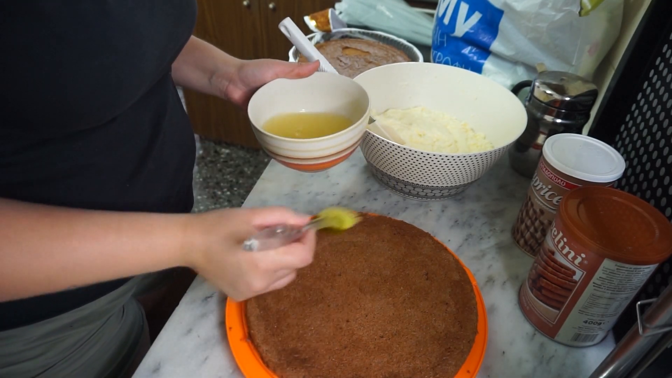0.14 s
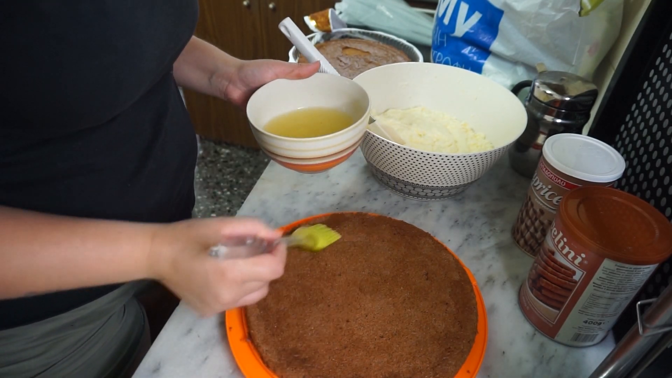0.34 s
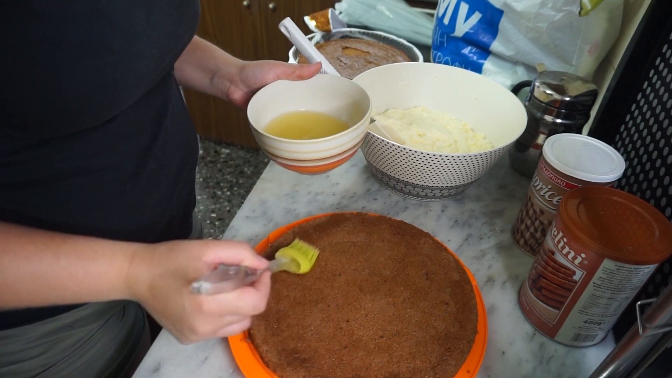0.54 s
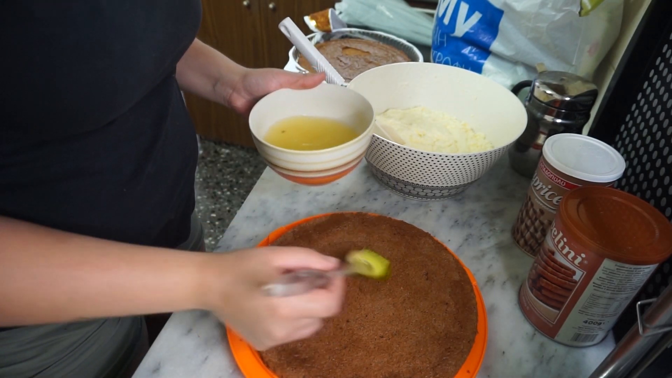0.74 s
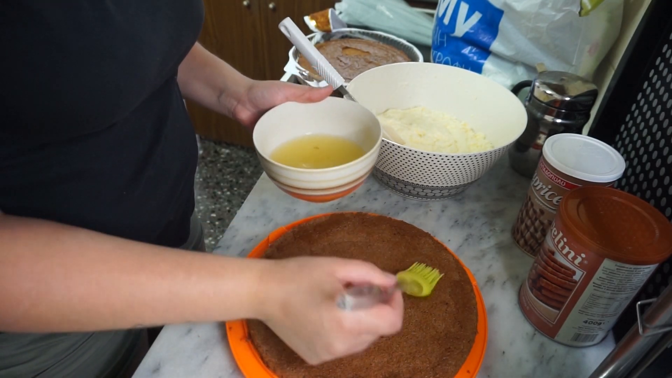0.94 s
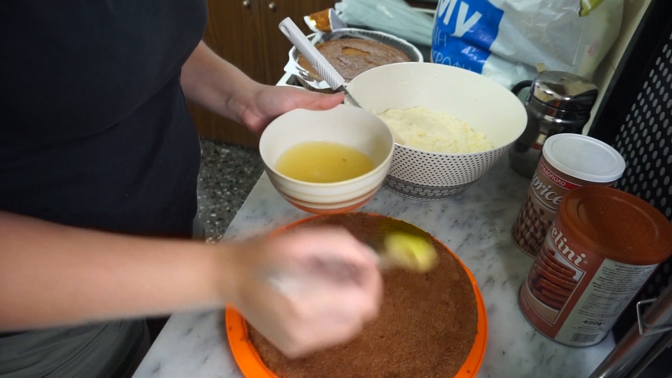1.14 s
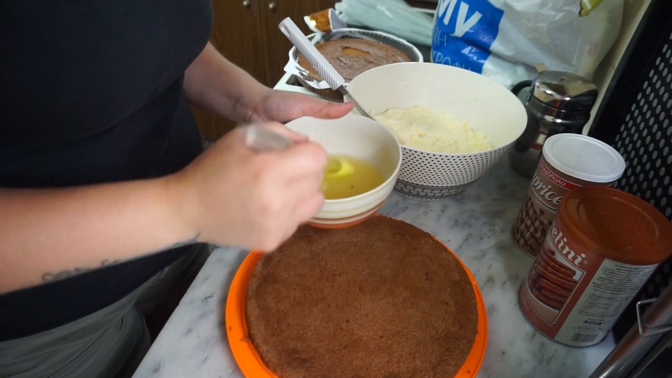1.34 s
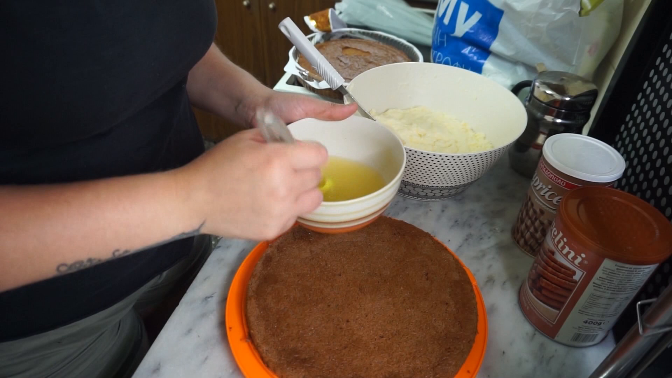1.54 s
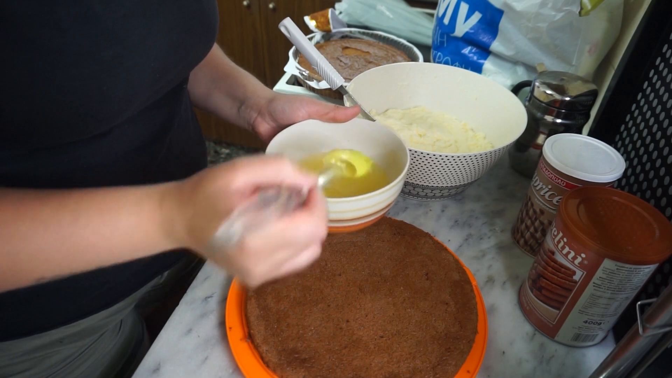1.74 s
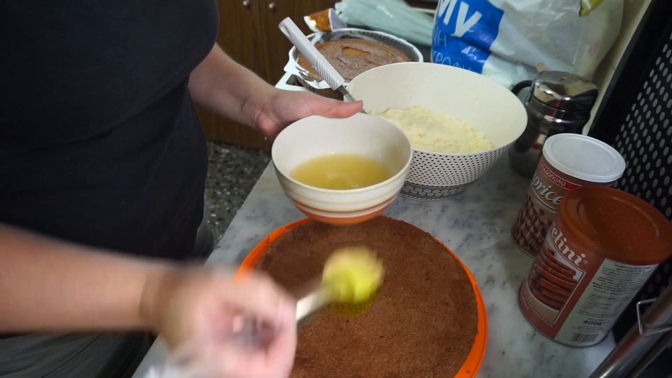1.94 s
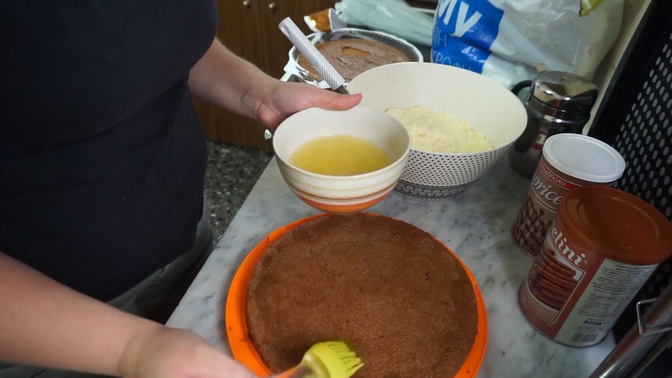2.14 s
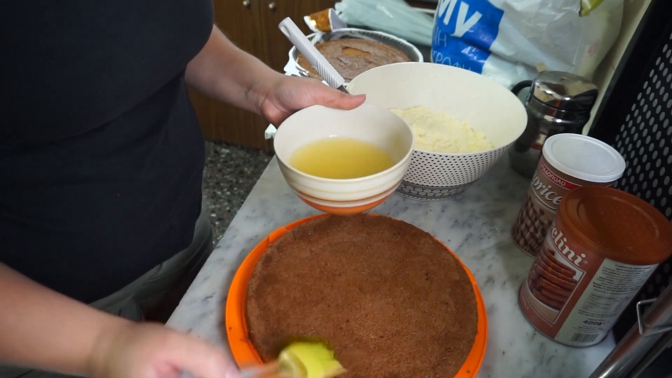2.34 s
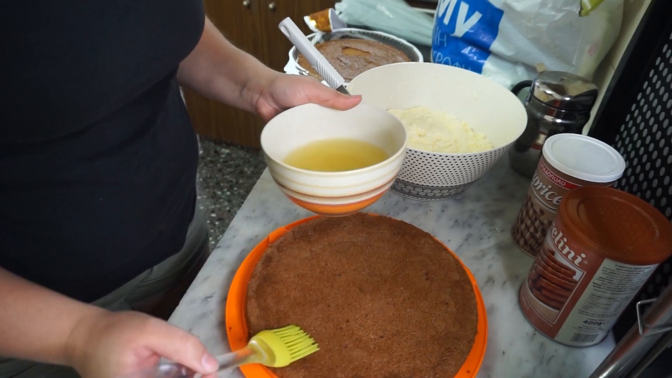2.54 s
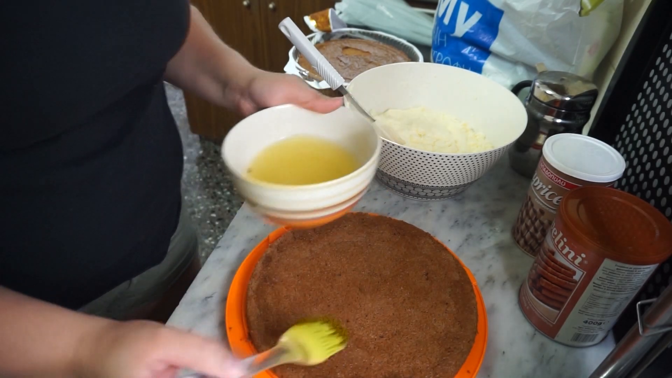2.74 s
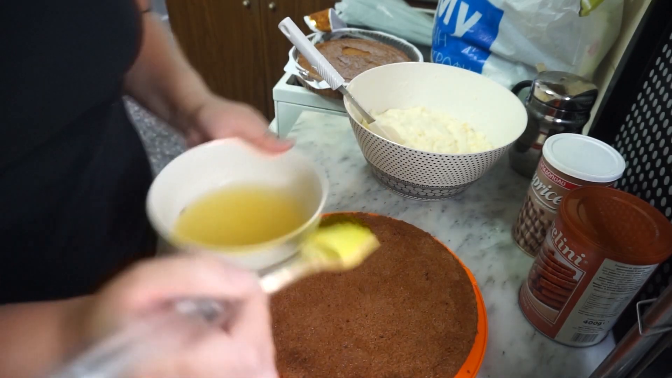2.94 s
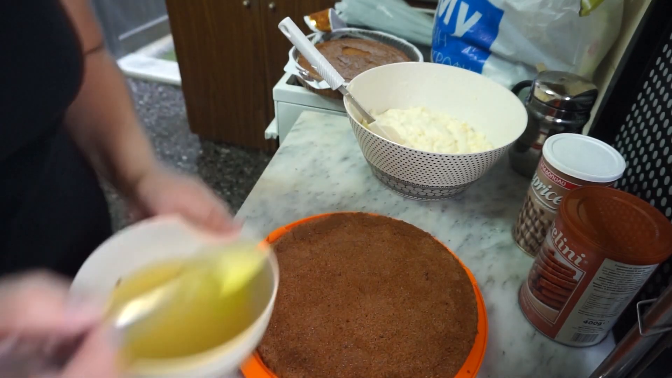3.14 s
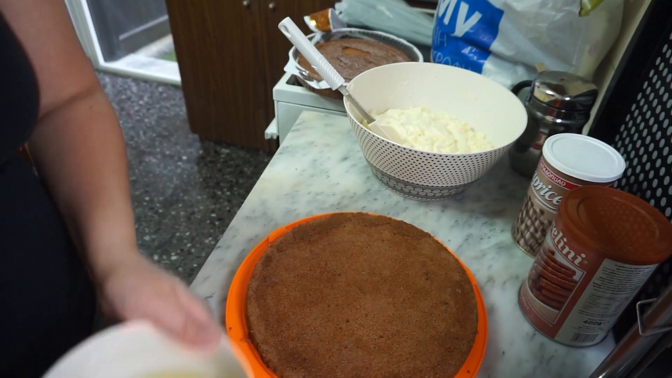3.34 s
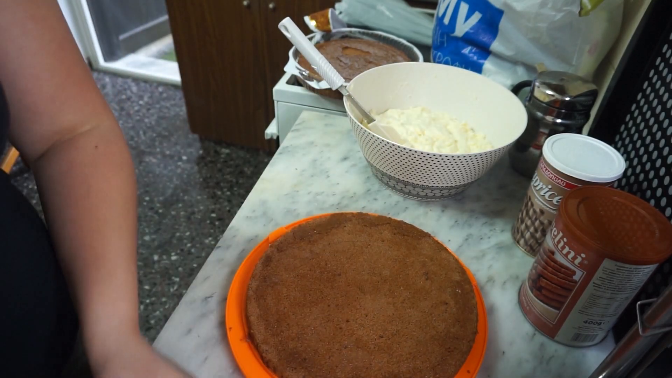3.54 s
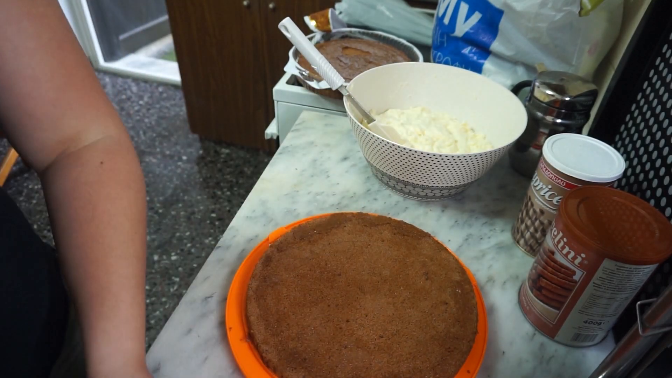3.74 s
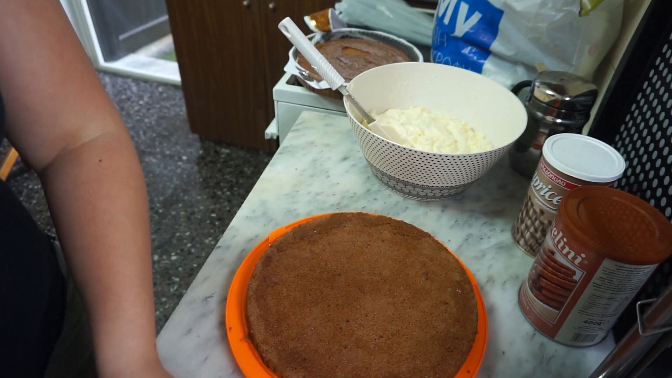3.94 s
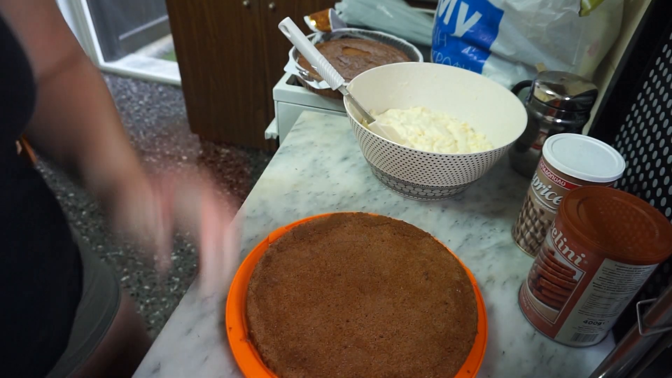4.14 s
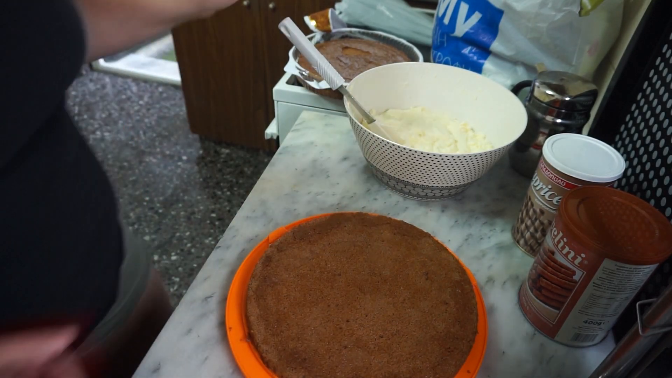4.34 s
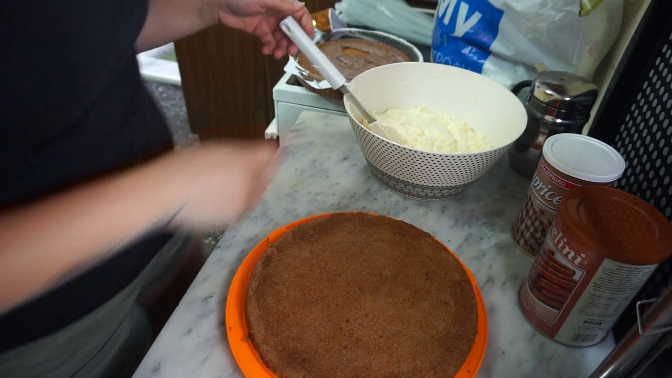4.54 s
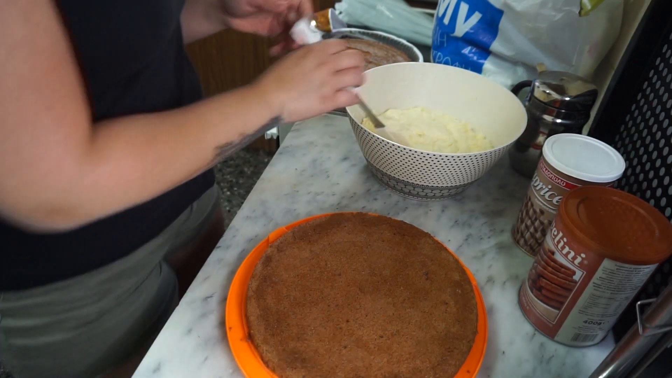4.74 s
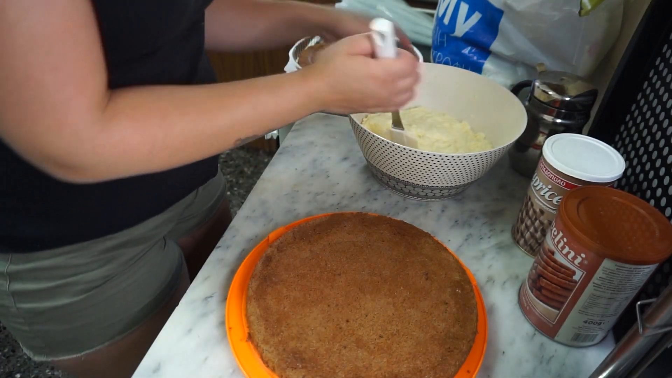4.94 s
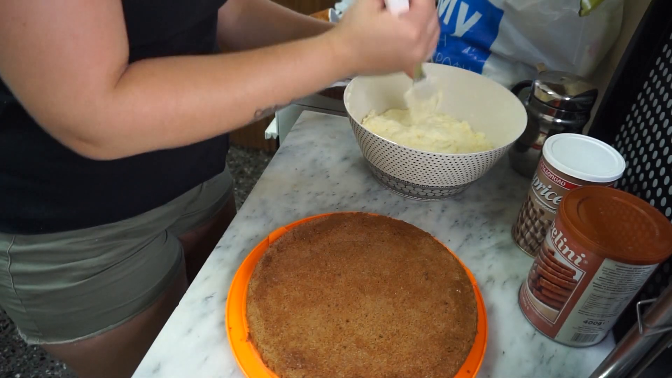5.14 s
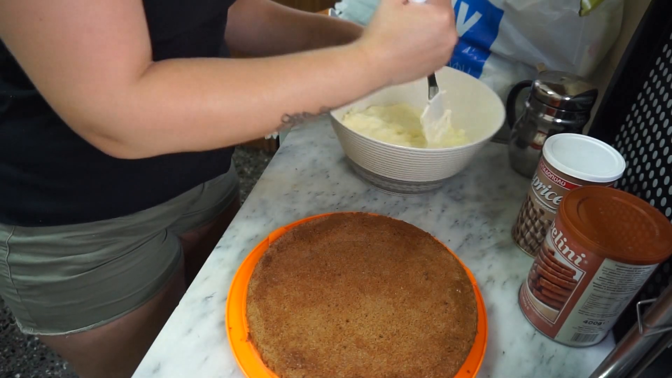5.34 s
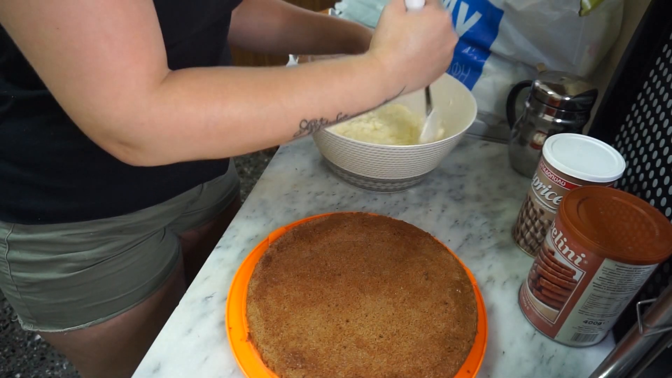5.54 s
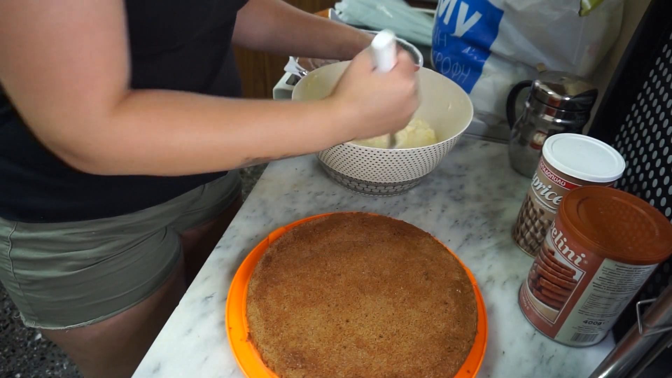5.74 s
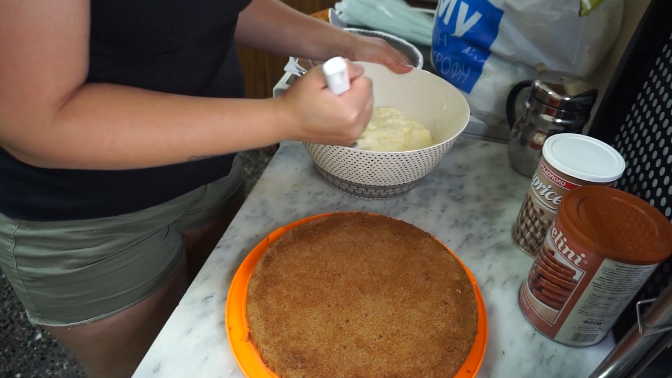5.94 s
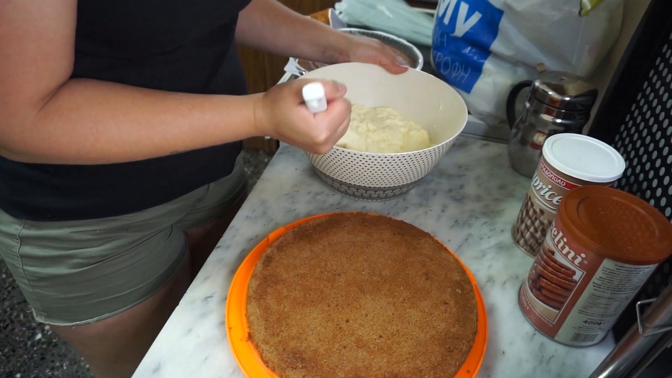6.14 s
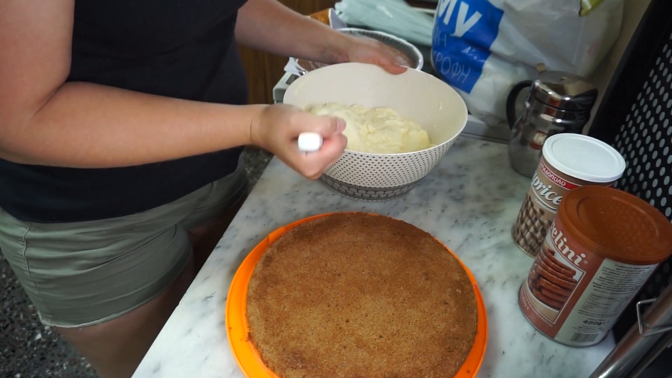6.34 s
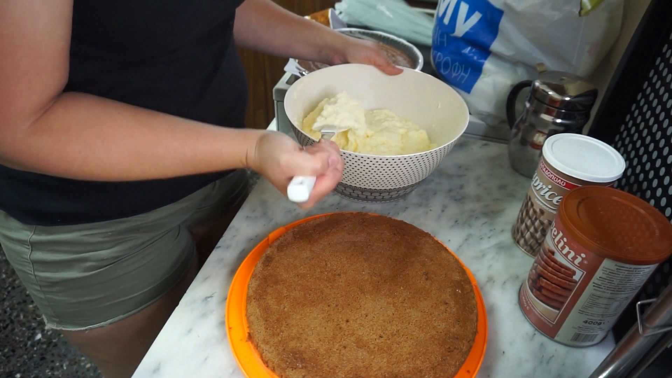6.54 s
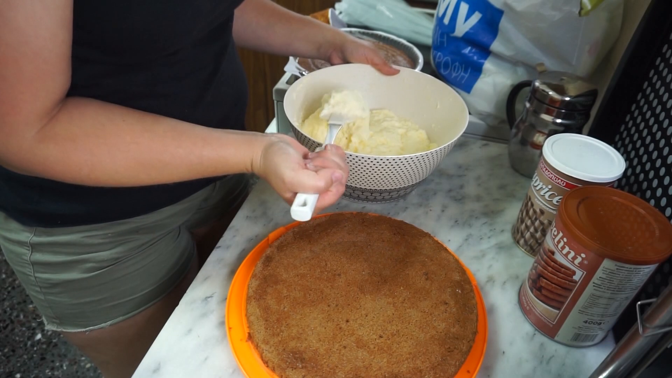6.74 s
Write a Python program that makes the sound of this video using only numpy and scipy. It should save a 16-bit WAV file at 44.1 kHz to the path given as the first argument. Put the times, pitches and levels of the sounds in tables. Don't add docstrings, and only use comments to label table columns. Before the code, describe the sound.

A wet pastry brush fizzes and taps, drops into a ceramic bowl that rocks loudly on stone, then a spatula scrapes and knocks a larger bowl.

```python
import sys
import numpy as np
from scipy import signal
from scipy.fft import rfft, irfft, next_fast_len
from scipy.io import wavfile

SR = 44100
rng = np.random.default_rng(int(sys.argv[2]) if len(sys.argv) > 2 else 0)


def invert_db(x):
    u = np.asarray(x, float) / 20
    return 10 ** u


def inscribe(sig):
    pcm = np.round(np.clip(np.atleast_2d(sig).T, -1, 1) * 32767)
    wavfile.write(sys.argv[1], SR, pcm.astype(np.int16))


N = 299439

# [f/Hz, density/dB per Hz]
AIR_COLOUR = [(35, -76), (60, -51), (91, -5), (219, -55.5), (278, -18), (353, -20), (617, -7.5), (695, -6),
              (1340, -1.5), (1480, -6.5), (2540, -8.5), (7000, -18), (9100, -35.5), (15400, -120)]
CLOTH_COLOUR = [(120, -67), (200, -37), (275, -23), (504, -17.5), (563, -47), (693, -9), (1030, -1),
                (2810, 0), (9000, -20), (11700, -61), (19800, -120)]
CREAM_COLOUR = [(240, -72), (400, -66), (580, 0.5), (719, -23), (1220, -21), (1290, -3.5), (1940, 3),
                (7000, -20.5), (9100, -49), (15400, -120)]
FIZZ_COLOUR = [(4000, -6), (6500, -4.5), (10000, -0.5), (14000, 0), (15800, -3.5), (16100, -35.5)]
# [f/Hz, width/Hz, level/dB]
FOOT_BODY = [(206, 50, -17), (343, 270, -9), (606, 159, 3.5), (910, 440, -1.5)]
RIM_BODY = [(1510, 1550, -7.5), (1860, 560, 3), (2390, 390, 3), (3270, 400, 4), (3950, 490, 1),
            (5440, 560, -12)]
EDGE_BODY = [(2500, 230, 0), (3270, 280, 1)]
# [f/Hz, t60/s]
WALL_DECAY = [(150, 0.64), (1000, 0.71), (3000, 0.74), (8000, 0.46), (15000, 0.4)]
# [f/Hz, likeness/0-1]
PORT_LIKENESS = [(60, .85), (130, .98), (260, .93), (520, .88), (1000, .7), (2400, .55), (6000, .4),
                 (9000, .35), (15000, .3)]
# [f/Hz, left lead/radians]
PORT_LEAD = [(0, -1), (2580, 0.9842), (3190, 0.87), (4740, 4.5), (5860, 4), (9130, 0.6), (16500, 1.5)]
# [f/Hz, left-right level/dB]
PORT_TILT = [(60, 0), (500, -.6), (1000, -1), (2000, -2.5), (4500, -1.5), (9000, -1), (15000, -.7)]

# [t/s, hold/s, level/dB]
DRONE_SWELLS = [(0, .1, -61), (1.1, 0.31, -53), (2.0, 1, -60), (5.8, 0.99, -65)]
# [t/s, hold/s, level/dB]
WEIGHT_SHIFTS = [(0, 0.33, -64.5), (.98, .01, -67), (2.04, .01, -66), (2.38, 0.025, -60), (2.7, 0.56, -74),
                 (3.95, 0.019, -53.5), (4.2, 0.69, -67), (5.46, 0.033, -47.5), (5.84, .02, -65)]
# [t/s, depth/dB]
GAIN_DUCKS = [
    (0, 11),
    (1.47, 1),
    (3.392, 12),
    (3.775, 15.5),
    (3.958, -4),
    (6.351, 1),
]
# [t/s, length/s, first top f/Hz, last top f/Hz, level/dB, share of the fall/0-1]
TRILLS = [(0.444, 0.096, 4350, 4190, -43, .5), (0.475, .06, 3900, 3600, -44, .6),
          (0.535, .045, 3560, 3500, -40, .25), (.6, .06, 3500, 3650, -52, .25),
          (0.6, 0.066, 4200, 4680, -44, .1), (0.662, .24, 4880, 4850, -32, .95),
          (.72, .15, 4100, 3800, -38, .5), (.93, .05, 2700, 2500, -47, .4),
          (0.977, 0.097, 4750, 4560, -50, .15)]

# [t/s, hold/s, level/dB]
SLEEVE_STROKES = [(.07, 0.02, -49), (.242, 0.0091, -48.5), (1.49, .004, -48), (2.1, 0.082, -50.5),
                  (2.296, .004, -43.5), (2.732, 0.047, -31.5), (2.85, 0.11, -34), (3.29, 0.1, -43.5),
                  (3.48, 0.048, -36.5), (3.6, 0.12, -45.5)]
# [t/s, hold/s, level/dB]
CREAM_PULL = [
    (4.8, 0.23, -40.5),
]
# [t/s, hold/s, foot level/dB, rim level/dB]
BOWL_SLIDES = [(.045, 0.0051, -34.5, -45), (5.15, 0.0039, -49, -41.5), (5.24, 0.035, -50.5, -46),
               (5.33, 0.033, -40, -37.5), (5.39, 0.015, -35.5, -38), (5.435, 0.015, -33, -37),
               (5.49, 0.013, -31.5, -35.5), (5.54, 0.024, -41, -37.5), (5.59, 0.033, -35, -33),
               (5.68, 0.0068, -38.5, -41.5), (5.786, 0.0062, -56, -53), (5.85, 0.12, -45.5, -41),
               (6.02, 0.19, -49.5, -49.5), (6.37, 0.06, -43, -43), (6.52, 0.04, -43, -40),
               (6.65, 0.02, -49, -52)]
# [t/s, hold/s, level/dB]
BLADE_SCRAPES = [
    (5.1, .03, -48),
    (5.29, .38, -40),
    (6.39, 0.044, -41.5),
    (6.505, 0.072, -41.5),
    (6.64, 0.029, -45.5),
]
# [t/s, hold/s, level/dB]
CRUST_FIZZ = [
    (0, 0.75, -47.5),
    (2.2, 0.96, -57),
]
# [t/s, hold/s, rate/dB over one a second]
BUBBLE_BURSTS = [
    (0, 0.32, 44),
    (2.05, .55, 31),
]
# [t/s, peak level/dB, left-right/dB, length/s, low end/dB]
BRISTLE_SMACKS = [(1.45, -46, 0, 0.022, -18), (1.4691, -22, -5, 0.018, -6), (1.4743, -31, -11, 0.03, -1),
                  (1.4834, -29.5, -5, 0.025, -3), (1.487, -41, -1, 0.02, -2), (1.503, -45, -3, 0.013, -15),
                  (1.548, -40.5, 3, 0.0094, -8), (1.849, -30.5, -3, 0.0059, -32),
                  (1.891, -40, -1.5, 0.011, -21), (3.382, -42.5, -3, .03, -20),
                  (3.394, -28.5, -4, 0.022, -13), (4.775, -47, -1, 0.031, -3), (5.1, -46, -6, .03, -15),
                  (5.14, -38.5, -5.5, 0.034, -16), (5.199, -46, -3, 0.054, -20),
                  (6.222, -26, -7, 0.014, 25), (6.351, -31, -9, 0.014, -9), (6.643, -37.5, -5, 0.024, -29),
                  (6.678, -46, -4, .025, -4)]
# [t/s, peak level/dB, left-right/dB, room/dB, f/Hz]
SOFT_THUDS = [(0.014, -31, -1.5, 4.5, 580), (0.027, -31, -4, -8, 925), (0.044, -27.5, -2, -19, 597),
              (0.036, -35, 0, -6, 420), (0.058, -35, 0, -4, 500), (0.26, -36, 0, -4, 546),
              (.655, -45, -2, 2, 490), (2.319, -20, -1, -6.5, 1033), (2.514, -27, -3.5, -2.5, 1028),
              (2.53, -35, -2.0, -16, 1230)]
LIGHT_TICKS = [(0.0144, -23, -6, -21, 2650), (0.0283, -21.5, -11, -11, 1740), (0.1077, -34, -6, -16, 3200),
               (1.4894, -28, -12, -12, 3270), (1.8487, -37, 1, -2, 2410), (2.228, -31.5, -5, -3, 3600),
               (2.1494, -35, -2, -11, 2800), (2.3201, -27.5, -7, -18, 2120), (3.755, -34, 3, -14, 4360),
               (5.0894, -34.5, -6, 7, 3320), (5.1472, -31, -9, -19, 2170), (5.2345, -25, -6, -3, 3830),
               (5.8394, -37, -8, 7, 1910), (6.4394, -29, -10, -7, 3150), (6.6428, -27, -7, -13, 3700),
               (6.661, -31, -5, -10, 3350)]

# [length/s, level/dB, left-right/dB, room/dB]
RIM_SONG = (.036, -15, 1.0, -12)
# [f/Hz, level/dB, t60/s]
HANDLE_MODES = [(962, -6.5, 0.043), (2020, 5, 0.021), (2320, -7, 0.036), (2500, -3, 0.027),
                (2617, 7.5, 0.02), (2850, 0.5, 0.035), (4200, -7, 0.037), (4460, -4, 0.043),
                (4654, -3.5, 0.04), (5910, -5.5, 0.038), (6322, -2, 0.11), (8950, -22, 0.06),
                (10480, -22, 0.06), (12900, -23, 0.05)]
BASE_MODES = [(225, -28, 0.041), (470, -20, 0.013), (698, -13.5, 0.016), (974, -2, 0.031),
              (1070, 0.5, 0.022), (1207, -7, 0.03), (1523, -7.5, 0.026), (1904, -2, 0.019),
              (2220, -8.5, 0.018), (2555, -10, 0.017), (3500, -24, 0.0078)]
CHATTER_MODES = [(707, -12, 0.024), (893, -4.5, 0.023), (1033, 3, 0.019), (1190, -4, 0.011),
                 (1910, -9, 0.014), (2400, -1.5, 0.017)]
BELL_MODES = [(2370, 0, 0.07), (6310, -6, 0.22), (9000, -24, 0.13), (11700, -24, 0.1), (15070, -24, 0.11)]
BLADE_MODES = [(738, -11.5, 0.012), (1500, -5.5, 0.01), (2583, 6, 0.0089), (2770, -3, 0.015),
               (3260, -3, 0.013), (3400, -5, 0.0057)]
HOLLOW_MODES = [(600, -14, .025), (780, -5.5, 0.021), (950, -0.5, 0.026), (1090, -2.5, .025),
                (1510, -12, .015), (1920, -12, 0.017)]
LIP_MODES = [(2160, -15, 0.018), (2567, -2, 0.022), (2656, -12.5, 0.063), (3020, -4, 0.018),
             (3340, -12, 0.012)]
# [t/s, peak level/dB, left-right/dB, room/dB]
HANDLE_DROP = [
    (3.3930, -2, -4, -4.5),
    (3.3962, -10, -4, -12),
    (3.499, -27, -5, -1),
]
BASE_ROCK = [
    (3.7765, -1, 0.94, -5),
    (3.7792, -9, 0.95, -12),
    (3.8605, -2, 0, -3.5),
    (3.8635, -9.5, 0, -8.5),
    (3.9595, -4.5, 0, -4.5),
    (3.9625, -6.5, 0, -6.5),
]
BASE_SETTLE = [
    (4.0598, -8, -0.71, -12.5),
    (4.0695, -15, -.8, -10),
    (4.0765, -13, -.8, -14),
    (4.082, -22, -.8, -10),
    (4.0865, -13.5, -.8, -9.5),
    (4.0925, -16.5, -0.74, -11.5),
]
BELL_PING = [
    (4.0605, -26, 0.0071, -5),
]
SPATULA_KNOCK = [
    (6.3512, -3, -6.5, -9),
    (6.3575, -14, -2, -15),
]
HOLLOW_WOBBLE = [(3.8745, -12, 0, -12), (3.8805, -16.5, 0, -12), (3.8855, -17, 0, -12),
                 (3.974, -13.5, -1, -8), (3.979, -16, -1, -8), (4.003, -21, 0, -8)]
LIP_RAP = [
    (1.892, -32, -5, -8),
    (1.9003, -15.5, -8, -10),
    (1.9165, -29, -6, -8),
]


def unit(x):
    return x / np.sqrt(np.mean(x ** 2) + 1e-20)


def along(points, hz):
    f, v = np.transpose(points)
    return np.interp(np.log(hz + 1), np.log(f + 1), v)


def envelopes(rows, rise_db, fall_db):
    t = np.arange(0, N + 64, 64) / SR
    gains = 0
    for s, hold, *dbs in rows:
        rise = rise_db * np.clip(s - t, 0, None)
        fall = fall_db * np.clip(t - s - hold, 0, None)
        gains = gains + invert_db(np.array(dbs)[:, None] - rise - fall)
    return [np.interp(np.arange(N) / SR, t, g) for g in gains]


def drift(rate, size=N):
    knots = rng.standard_normal(int(np.ceil(size * rate / SR + 1)))
    return np.interp(np.arange(size) * rate / SR, np.arange(size * rate / SR + 1), knots)


def filtered(x, response):
    m = next_fast_len(x.shape[-1] + 4096)
    return irfft(rfft(x, m) * response(np.fft.rfftfreq(m, 1 / SR)), m)[..., :x.shape[-1]]


def peaks(table):
    def response(f):
        total = 0
        for k, (centre, width, db) in enumerate(table):
            total = total + (-1) ** k * invert_db(db) * 1j * f * width / (centre * centre - f * f + 1j * f * width)
        return total
    return response


def drawn(table):
    return lambda hz: invert_db(along(table, hz))


def steep(table):
    return lambda hz: np.abs(peaks(table)(hz)) ** 1.13


def port_mix(pair, hz):
    turn = np.arccos(np.clip(along(PORT_LIKENESS, hz), -1, 1)) / 2
    mid, side = pair[0] * np.cos(turn), pair[1] * np.sin(turn)
    half = invert_db(along(PORT_TILT, hz) / 2) * np.exp(.5j * along(PORT_LEAD, hz))
    return np.array([(mid + side) * half, (mid - side) / half])


def rub(colour, grit_db, rate, patch_db=2.0):
    m = next_fast_len(N)
    hz = np.fft.rfftfreq(m, 1 / SR)
    grit = invert_db(grit_db * drift(rate) + patch_db * drift(25)) * rng.standard_normal((2, N))
    return unit(irfft(port_mix(rfft(grit, m), hz) * colour(hz), m)[:, :N])


def placed(x, pan_db, room_db, count=150):
    hz, t = np.fft.rfftfreq(256, 1 / SR)[:, None], np.arange(count) * 128 / SR
    z = rng.standard_normal((2, len(hz), len(t), 2)) @ [1, 1j]
    decay = invert_db(-60 * t / along(WALL_DECAY, hz)) * np.clip(t / 0.0032, 0, 1)
    tail = signal.istft(port_mix(z, hz) * decay, nperseg=256)[1]
    m = next_fast_len(len(x) + tail.shape[1])
    side = np.array([[.5], [-.5]])
    lead = along(PORT_LEAD, np.fft.rfftfreq(m, 1 / SR))
    direct = invert_db(side * pan_db) * np.exp(0.7j * side * lead)
    walls = invert_db(room_db) * rfft(unit(tail), m) / np.sqrt(tail.shape[1])
    return irfft(rfft(x, m) * (direct + walls), m)


def add(mix, s, x):
    part = mix[:, round(s * SR):][:, :x.shape[1]]
    part += x[:, :part.shape[1]]


def strike(modes, crack_db, attack, crack_hz, crack_t60=0.011):
    hz, db, t60 = np.transpose(modes)[..., None]
    t = np.arange(int(SR * (np.max(t60) + 0.018))) / SR
    level = db + rng.normal(0, 1.3, db.shape) - 60 * t / t60
    ring = np.sum(invert_db(level) * np.sin(2 * np.pi * hz * t), axis=0)
    band = signal.butter(3, [crack_hz / 2, crack_hz * 1.31], "band", fs=SR, output="sos")
    noise = unit(signal.sosfilt(band, rng.standard_normal(len(t))))
    crack = invert_db(crack_db - 60 * t / crack_t60) * noise
    x = (ring + crack) * (1 - np.exp(-t / attack)) ** 2
    return x / np.abs(x).max()


def duck_db():
    quick_s, slow_s, slow_share = 0.34, 1.27, 0.65
    t = np.arange(N) / SR
    gain_db = np.zeros(N)
    for s, db in GAIN_DUCKS:
        u = t - s
        quick = (1 - slow_share) * np.exp(-np.abs(u) / quick_s)
        slow = slow_share * np.exp(-np.abs(u) / slow_s)
        gain_db -= db * (u >= 0) * (quick + slow)
    return gain_db


def room_tone():
    air_level = invert_db(-43 + 0.11 * drift(2.9))
    air = air_level * rub(drawn(AIR_COLOUR), grit_db=1.45, rate=22, patch_db=0.33)
    drone_level = invert_db(-63.5) + envelopes(DRONE_SWELLS, rise_db=61, fall_db=30)[0]
    drone = drone_level * rub(peaks([(716.0, 17, 0)]), grit_db=3.5, rate=5.7)
    hum = invert_db(-59.5 + 4 * drift(7)) * np.sin(2 * np.pi * 99 * np.arange(N) / SR + 1.3 * drift(12))
    rumble_level = invert_db(-102) + envelopes(WEIGHT_SHIFTS, rise_db=77, fall_db=88.5)[0]
    rumble = rumble_level * rub(peaks([(171, 56, -5), (302, 69, 0.5)]), grit_db=-1.5, rate=16)
    return invert_db(0.69 * duck_db()) * (air + drone) + hum + rumble


def bird():
    fall_start, fall_per_s, fall_most = 0.0297, 5.5, .45
    mix = np.zeros((2, N))
    for s, length, first_hz, last_hz, db, fall in TRILLS:
        t = np.arange(int(length * SR)) / SR
        note = np.cumsum(48 * (1 + 0.33 * drift(30, size=len(t)))) / SR % 1
        depth = fall * np.clip(fall_start + fall_per_s * t, 0, fall_most)
        drop = depth * note * (1 + .3 * drift(40, size=len(t)))
        pitch = np.linspace(first_hz, last_hz, len(t)) * (1 - drop)
        level = invert_db(db - 40 * t) * np.sin(np.pi * note) ** 0.22 * (1 - .5 * note)
        call = level * np.sin(2 * np.pi * np.cumsum(pitch) / SR)
        add(mix, s, invert_db(-2.0) * placed(call, pan_db=-4.5, room_db=5))
    return mix


def seep():
    rate = 3.0 + envelopes(BUBBLE_BURSTS, rise_db=60, fall_db=120)[0]
    pops = (rng.random(N) < rate / SR) * invert_db(2.9 * rng.standard_normal(N))
    t = np.arange(120) / SR
    total = np.zeros(N)
    for hz, db in ((9500, -50), (10900, -46), (11700, -50), (12900, -45.5), (14000, -57)):
        pop = np.sin(2 * np.pi * hz * t) * np.sin(np.pi * t / t[-1]) ** 2
        chosen = pops * (rng.random(N) < .3)
        total += invert_db(db) * signal.fftconvolve(chosen, pop)[:N]
    return total * invert_db(np.array([[-1.2], [0]]))


def smacks():
    mix, t = np.zeros((2, N)), np.arange(SR // 10) / SR
    for s, db, pan_db, length, low_db in BRISTLE_SMACKS:
        crackle = rng.standard_normal(len(t)) * invert_db(3.5 * drift(2000, size=len(t)))
        dull = peaks([(3900, 3000, low_db + 6)])
        colour = lambda hz: drawn(FIZZ_COLOUR)(hz) * (hz > 3000) + dull(hz)
        shape = invert_db(-30 * t / max(length, .003)) * (1 - np.exp(-t / 0.0005))
        burst = unit(filtered(crackle, colour)) * shape
        add(mix, s, invert_db(db - 0.5) * placed(burst, pan_db, room_db=-7, count=70))
    return mix


def strokes():
    foot, rim = envelopes(BOWL_SLIDES, rise_db=274, fall_db=174)
    sleeve, = envelopes(SLEEVE_STROKES, rise_db=595, fall_db=112)
    lift, = envelopes(CREAM_PULL, rise_db=156, fall_db=90)
    scrape, = envelopes(BLADE_SCRAPES, rise_db=400, fall_db=223)
    steady = invert_db(-55) + envelopes(CRUST_FIZZ, rise_db=20, fall_db=31)[0]
    hiss = invert_db(duck_db()) * steady + invert_db(-22.5) * sleeve + invert_db(-16) * rim
    mix = sleeve * rub(drawn(CLOTH_COLOUR), grit_db=0.5, rate=430)
    mix += lift * rub(drawn(CREAM_COLOUR), grit_db=0.0, rate=210)
    mix += foot * rub(steep(FOOT_BODY), grit_db=1.0, rate=140)
    mix += rim * rub(steep(RIM_BODY), grit_db=1.5, rate=180)
    mix += scrape * rub(steep(EDGE_BODY), grit_db=3.0, rate=260, patch_db=1.5)
    mix += hiss * rub(drawn(FIZZ_COLOUR), grit_db=1.0, rate=390, patch_db=0.3)
    return mix


def taps():
    mix = np.zeros((2, N))
    # (ratio, level/dB)
    kinds = ((SOFT_THUDS, 0.025, [(.32, -9.5), (.55, -2), (1.9, -14), (3.1, -20)]),
             (LIGHT_TICKS, 0.011, [(.86, -7), (1.17, 0.5), (1.6, -33)]))
    for rows, t60, neighbours in kinds:
        for s, db, pan_db, room_db, hz in rows:
            modes = [(hz, 0, t60)] + [(hz * ratio, level, 0.74 * t60) for ratio, level in neighbours]
            tap = strike(modes, crack_db=-8.5, attack=0.0016, crack_hz=1.36 * hz)
            add(mix, s, invert_db(db) * placed(tap, pan_db, room_db, count=70))
    return mix


def singing():
    length, db, pan_db, room_db = RIM_SONG
    t, mix = np.arange(SR // 2) / SR, np.zeros((2, N))
    held = invert_db(3.1 * drift(120, size=len(t)) - 90 * t - 3100 * np.clip(t - length, 0, None))
    choked = invert_db(-12 + 4 * drift(40, size=len(t)) - 60 * t / .45)
    left = choked * np.clip(t / length - .5, 0, 1)
    tone = (held + left) * (1 - np.exp(-t / .001)) * np.sin(2 * np.pi * 4128 * t)
    add(mix, 4.061, invert_db(db) * placed(tone, pan_db, room_db))
    return mix


def crockery():
    mix = np.zeros((2, N))
    # blows, modes, crack level/dB, attack/s, crack f/Hz, crack t60/s
    kinds = ((HANDLE_DROP, HANDLE_MODES, -2, .0008, 3900, .03),
             (BASE_ROCK, BASE_MODES, 3, .0004, 1350, .013),
             (BASE_SETTLE, CHATTER_MODES, -4, .0006, 1200, .02),
             (BELL_PING, BELL_MODES, -15, .0012, 4000, .01),
             (SPATULA_KNOCK, BLADE_MODES, -3, .0005, 2900, .008),
             (HOLLOW_WOBBLE, HOLLOW_MODES, -6, .0006, 1300, .012),
             (LIP_RAP, LIP_MODES, -12, .0006, 3300, .008))
    for blows, modes, *contact in kinds:
        for s, db, pan_db, room_db in blows:
            blow = strike(modes, *contact)
            add(mix, s + 0.001003, invert_db(db) * placed(blow, pan_db, room_db))
    return mix


def scene():
    background = room_tone() + bird()
    wet = seep() + smacks()
    return background + wet + strokes() + taps() + singing() + crockery()


def top_cut(x):
    return signal.sosfilt(signal.butter(12, 16850, fs=SR, output="sos"), x)


def record(dry):
    soft = dry / (1 + np.abs(dry / 1.05) ** 6) ** (1 / 6)
    cut = signal.sosfilt(signal.butter(6, 150, "high", fs=SR, output="sos"), soft)
    cut = signal.sosfilt(signal.butter(16, 16100, fs=SR, output="sos"), cut)
    low_pass = signal.butter(2, 70, fs=SR, output="sos")
    circuit = invert_db(-60.5) * signal.sosfilt(low_pass, rng.standard_normal(dry.shape))
    return top_cut(np.clip(circuit + cut, -1, 1))


dry = scene()
out = record(dry)
inscribe(out)
```